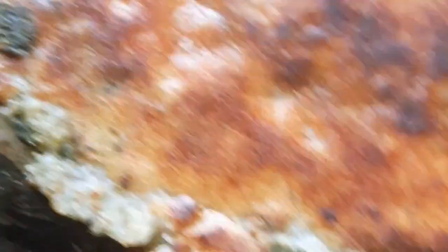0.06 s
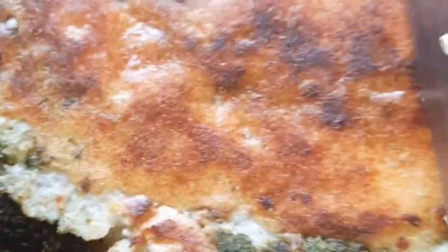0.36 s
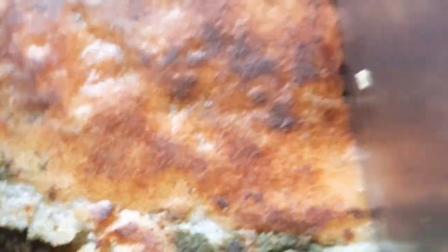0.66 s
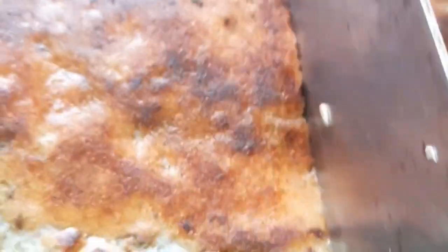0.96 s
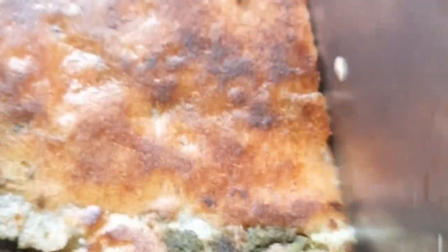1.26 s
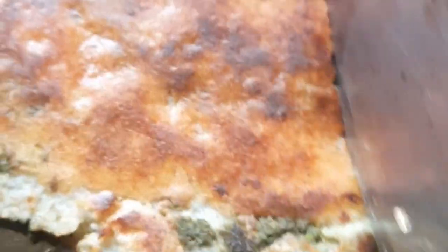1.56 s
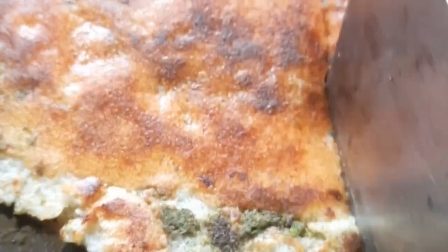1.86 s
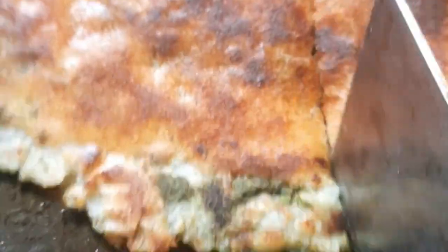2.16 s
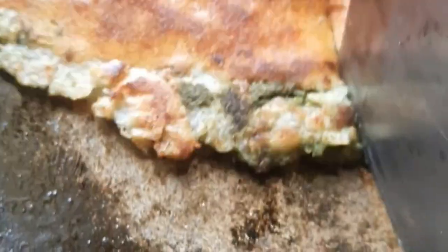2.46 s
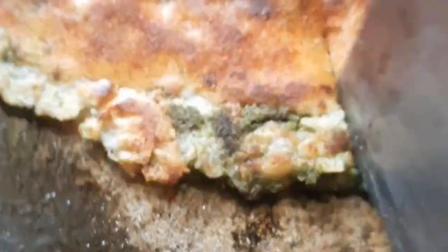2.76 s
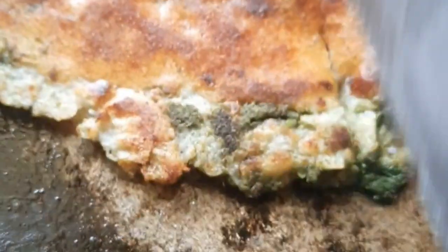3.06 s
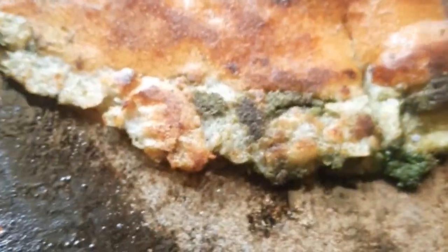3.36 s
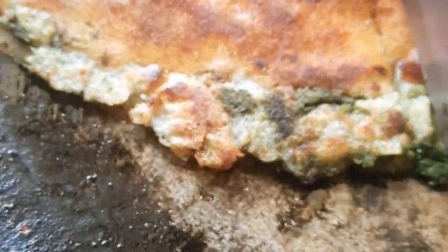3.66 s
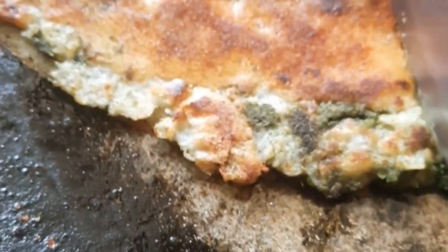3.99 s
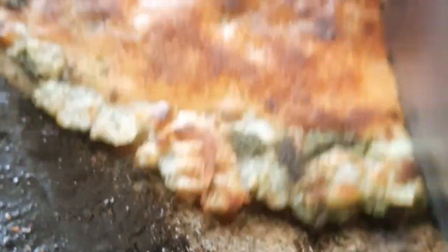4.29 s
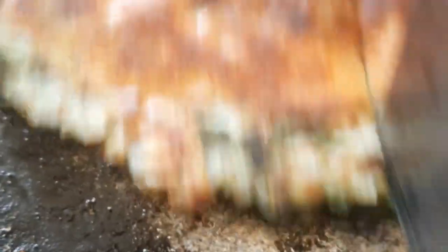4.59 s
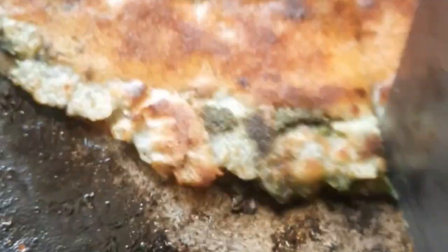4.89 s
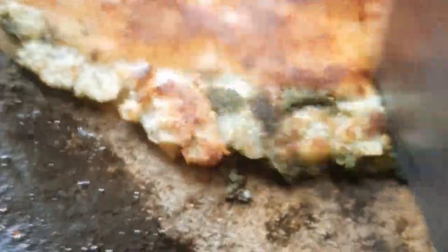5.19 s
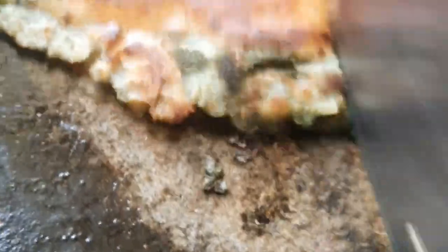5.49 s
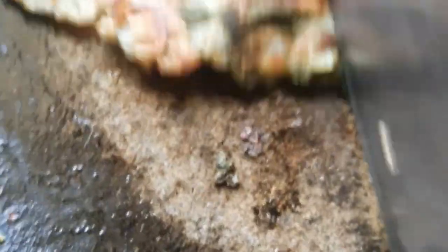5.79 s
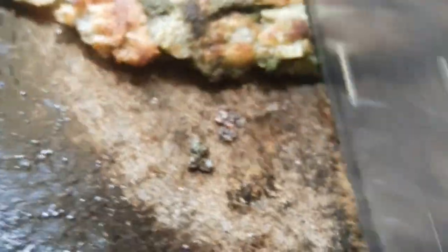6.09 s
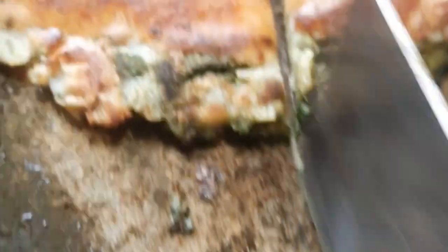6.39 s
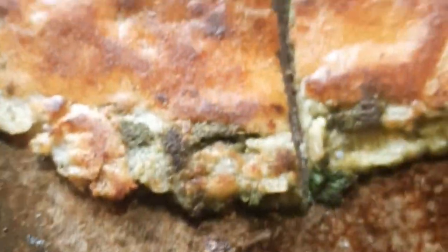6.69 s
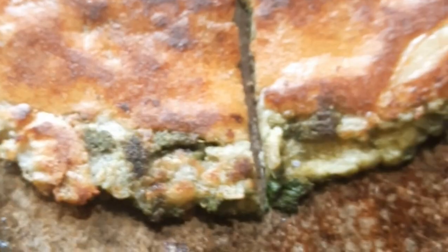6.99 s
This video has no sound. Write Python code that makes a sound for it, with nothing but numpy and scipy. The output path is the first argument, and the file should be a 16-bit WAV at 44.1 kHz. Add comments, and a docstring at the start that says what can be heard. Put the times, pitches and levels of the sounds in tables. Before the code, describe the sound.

A steel spatula works on a hot griddle, heard close in a kitchen with a short reverb and a faint low hum. Oil sizzles quietly throughout, with a few spits, the sharpest at 0.9 seconds. At 0.6 seconds the blade clacks on the plate, and gentle, gritty scrapes follow until about 2.8 seconds. The pancake slides and flops down with a soft, hollow thud around 2.2 seconds, then the blade knocks and rings briefly. From 3 to 4 seconds there is only fizzing and two very faint squeaks. A knock at 4 seconds starts a run of quick, hard scrapes, about seven a second, mixed with crunching crumbs and metallic knocks. The blade rings near 5.9 and 6.4 seconds, with a sharp clack at 6.3. Low puffs of air buffet the microphone's left side between 5.2 and 5.8 seconds, and more softly near 6.8. A thin squeak at 6.5 seconds leaves light sizzling.

```python
"""In a kitchen, a steel spatula works under a pancake on a hot griddle: gently, then in quick hard strokes.
Its edge sticks and slips on the plate, crushes burnt crumbs and knocks; the blade rings as it springs free.
The pancake slides, judders and flops, oil sizzles in tiny bursts of steam, and a few thin squeaks glide by.
Puffs of air buffet the left microphone port. Hard walls add a short reverb over a low room hum."""
import sys
import numpy as np
from scipy import signal
from scipy.fft import rfft, irfft, next_fast_len
from scipy.io import wavfile
from scipy.ndimage import uniform_filter1d

SR = 44100
rng = np.random.default_rng(int(sys.argv[2]) if len(sys.argv) > 2 else 0)


def transcribe(signal):
    """Save signal, clipped to [-1, 1], as a 16-bit WAV file at the path in sys.argv[1]."""
    frames = np.atleast_2d(signal).T
    limited = np.clip(frames, -1, 1)
    pcm = np.round(limited * 32767).astype(np.int16)
    wavfile.write(sys.argv[1], SR, pcm)


N = 310905
TIME = np.arange(N) / SR
SHORT_RING, LONG_RING = SR // 5, SR * 3 // 5   # response lengths in samples


# spatula strokes (time [s], half length [s], level [dB], steepness [dB]); steepness + digs in, - skims
STROKES = [(0.621, 0.018, -48, -20), (0.685, 0.044, -43, -1.5), (0.83, 0.066, -51, -8.5),
           (0.967, .03, -45.5, -1), (1.115, 0.036, -52, 2), (1.27, 0.033, -37.5, 0),
           (1.507, 0.077, -44, 1.5), (1.662, 0.023, -42, 0), (1.85, 0.044, -57, -12),
           (1.978, .025, -39.5, 3), (2.086, 0.037, -49, -4), (2.299, 0.031, -35.5, -10),
           (2.644, 0.04, -49.5, 1), (2.733, 0.03, -37, 2), (3.934, 0.0086, -69, -23.5),
           (4.146, .03, -42.5, 0), (4.271, .032, -29.5, -1), (4.459, 0.029, -29, 1.5),
           (4.569, 0.039, -34.5, 1), (4.66, 0.05, -46.5, 2), (4.767, 0.026, -26.5, 0.5),
           (4.87, 0.074, -41.5, 0), (5.024, 0.022, -33.5, 2), (5.118, 0.035, -37, 7.5),
           (5.262, 0.03, -30, -0.5), (5.405, 0.033, -39.5, -3.5), (5.551, 0.04, -28.5, 1.5),
           (5.68, 0.026, -28.5, -1), (5.824, .027, -26, -0.5), (6.002, 0.036, -26.5, -2.5),
           (6.136, .04, -26.5, -1.5), (6.267, 0.0099, -31, 1.5), (6.364, 0.045, -27.5, -1.5)]

def stroking(middling_db=-34.5, fall_over_rise=0.93):
    """Envelopes of food, plate, blade and grit: a steep blade shakes the plate, a flat one crushes grit."""
    times, half_s, db, steep_db = np.transpose(STROKES)
    effort_db = db - middling_db
    food_db = -40.5 + 0.71 * effort_db
    plate_db = db + 1 + steep_db
    grit_db = -39 + 0.73 * effort_db - 0.75 * steep_db
    grit_half_s = 1.05 * half_s   # grit is crushed even at low speed, so it lingers
    layers = [(half_s, food_db), (half_s, plate_db), (half_s, db), (grit_half_s, grit_db)]
    return [swell(times, rise_s, rise_s * fall_over_rise, layer_db) for rise_s, layer_db in layers]


def friction(slide):
    """Strokes, the brief skid after each knock and the sliding pancake add up in power."""
    food, plate, blade, grit = stroking()
    times, _, clunk_db = np.transpose(KNOCKS)
    skid = swell(times + 0.0021, rise_s=0.007, fall_s=0.016, db=clunk_db)
    food = np.hypot(food, from_db(-1) * slide)
    plate = np.hypot(plate, from_db(-9) * slide)   # the crust scratches the plate
    plate = np.hypot(plate, from_db(-9.5) * skid)
    blade = np.hypot(blade, from_db(-12) * skid)
    grit = np.hypot(grit, from_db(-20.5) * skid)
    return food, plate, blade, grit


# body of the scrape, the blade pressed on the plate (frequency [Hz], width [Hz], level [dB])
PRESSED_MODES = [(544, 33, -1.5), (670, 13.4, 5), (710, 39, -0.5), (808, 44, -5), (929, 12, -2.5),
                 (1740, 79.8, 6), (2060, 44, -7.5), (2576, 36, 0)]
# zing of the blade's highest modes (frequency [Hz], width [Hz], level [dB])
EDGE_MODES = [(4025, 38, 9), (4533, 200, 2), (5124, 36, 6.5), (6010, 29, 6), (7040, 120, -12.5),
              (7550, 36, -6.5)]
# dense metallic wash of the steel (frequency [Hz], level [dB])
STEEL_SPECTRUM = [(250, -10), (500, -14), (750, -5.5), (1080, -6), (1450, -5.5), (1800, 9.5), (2350, -6),
                  (2700, 0.5), (3400, -15), (6000, -13.5), (16000, -53)]
# bright rasp of burnt crumbs (frequency [Hz], level [dB])
GRIT_SPECTRUM = [(2500, -1.5), (3300, -10), (4200, -3.5), (6000, -3.5), (8200, -3), (9000, -20),
                 (10200, -10), (11800, -8), (16000, -10.5)]

def scraping(plate, blade, grit, contacts=3):
    """The edge sticks and slips at a few points; the load wanders between them and shifts the colour."""
    loads = np.array([from_db(10.2 * drift(22)) for _ in range(contacts)])
    loads = loads / np.linalg.norm(loads, axis=0)
    chatter = drift(130)   # bunches the slips into clumps
    out = 0
    for load in loads:
        slips = grains(per_s=750, spread_db=4) * load * from_db(2 * chatter)
        pressed = resonances(PRESSED_MODES, spread=0.39, vary_db=5)
        steel = unit(pressed + from_db(-2.5) * wash(STEEL_SPECTRUM, t60=0.039))
        plate_force = from_db(-2) * drive(slips * plate, steel, low_hz=608, high_hz=1122)
        blade_force = from_db(0.43) * drive(slips * blade, steel, low_hz=1510, high_hz=3044)
        # crumbs are crushed under the same point and stir the blade's highest modes
        rasp = grains(per_s=6000, spread_db=2) * load * from_db(1.5 * chatter)
        crunch = wash(GRIT_SPECTRUM, t60=0.01)
        edge = unit(crunch + from_db(-8.5) * resonances(EDGE_MODES, spread=0.47, vary_db=6))
        out = out + through(plate_force + blade_force, steel) + from_db(0.88) * through(rasp * grit, edge)
    return out


# hits of the edge on the plate (time [s], crack level [dB], clunk level [dB])
KNOCKS = [(0.6259, -2.5, -17), (1.193, -40, -29), (1.451, -43, -37), (1.806, -28, -29.5), (2.263, -43, -31),
          (2.299, -16.5, -21), (3.9909, -7, -25.5), (4.233, -14, -21.5), (4.348, -27, -17.5),
          (4.425, -45, -24), (4.841, -15, -15.5), (4.986, -36, -28.5), (5.112, -21.5, -24),
          (5.348, -22, -17.5), (5.514, -18, -24.5), (5.577, -20.5, -20), (5.776, -27, -25),
          (5.862, -11, -11.5), (6.164, -9.5, -21.5), (6.3008, -1.5, -20)]
# bright crack of the struck blade (frequency [Hz], width [Hz], level [dB])
CRACK_MODES = [(1770, 150, 0), (1990, 240, 0), (2660, 280, -2), (4010, 200, -18), (5230, 200, -19)]
# dull clunk of the struck plate (frequency [Hz], width [Hz], level [dB])
CLUNK_MODES = [(525, 33, -2.5), (778, 52, 11), (943, 25, 7)]

def knocking():
    """The edge hits: the blade cracks, the plate clunks, and a dense steel tail follows."""
    times, crack_db, clunk_db = np.transpose(KNOCKS)
    attack = from_db(-9) * wash(STEEL_SPECTRUM, t60=0.015)
    tail = from_db(-2.5) * wash(STEEL_SPECTRUM, t60=0.13)
    crack = band(resonances(CRACK_MODES, spread=0.7) + attack + tail, 950, 15000, order=1)
    clunk = band(resonances(CLUNK_MODES, spread=0.8), 380, 2500, order=2)
    return sum(through(taps(times, db), body / np.abs(body.mean(0)).max())
               for db, body in [(crack_db, crack), (clunk_db, clunk)])


# the blade springs free (time [s], level [dB])
RELEASES = [(0.627, -42), (2.305, -29.5), (3.991, -44.5), (5.863, -28), (6.021, -29), (6.391, -33)]
# ring of the free blade (frequency [Hz], level [dB], t60 [s])
FREE_MODES = [(658, -11, .6), (921, 2, .66), (1186, -4, .4), (1415, -8, .38), (1610, -8, .62),
              (1750, -6, .52), (2207, -6, .47), (2756, -12, .5), (3016, -11, .4), (3965, -20, .45),
              (5965, -21, .3)]

def ringing():
    """Lifted off the plate, the blade rings out freely."""
    partials = [(hz, from_db(db), np.log(1000) / t60) for hz, db, t60 in FREE_MODES]
    return through(taps(*np.transpose(RELEASES)), modes(partials, spread=1, size=LONG_RING))


# pushes of the pancake (time [s], half length [s], level [dB])
SLIDES = [(0.704, 0.058, -43.5), (1.326, 0.038, -43), (1.695, 0.047, -45.5), (2.035, 0.052, -34),
          (2.363, .08, -38.5), (2.832, 0.21, -51)]

def sliding():
    """Envelope of the pancake sliding over the plate."""
    times, half_s, db = np.transpose(SLIDES)
    return swell(times, half_s, half_s, db)


# a fold of food flops down (time [s], level [dB])
FLOPS = [(0.662, -31.5), (2.147, -27.5), (2.191, -25)]
# muffled drag of soft food (frequency [Hz], level [dB])
FOOD_SPECTRUM = [(130, -11), (230, -14.5), (310, 6), (380, 0), (520, 2.5), (610, -4.5), (800, -33)]

def dragging(food, hollow_hz=307, hollow_t60=0.36):
    """Soft food judders and flops; both, like the knocks, stir the griddle's hollow lowest mode."""
    judder = grains(per_s=1500, spread_db=1.5) * food
    drag = from_db(-1.5) * through(judder, wash(FOOD_SPECTRUM, t60=0.07))
    knock_times, crack_db, _ = np.transpose(KNOCKS)
    flops = taps(*np.transpose(FLOPS))
    hollow = modes([(hollow_hz, 1, np.log(1000) / hollow_t60)], spread=0.79, size=LONG_RING)
    push = from_db(-14) * judder / np.linalg.norm(hollow.mean(0))
    push += from_db(-32.5) * taps(knock_times, crack_db) + from_db(-3.5) * flops
    thud = modes([(284, 0.475, 130)], spread=0.5)
    return drag + through(push, hollow) + through(flops, thud)


# hoarse tone of the sliding crust (frequency [Hz], width [Hz], level [dB])
CRUST_MODES = [(565, 28, 0.5), (700, 120, -9.5)]

def rubbing(slide):
    """The crust grips and lets go in quick small slips."""
    slips = grains(per_s=600, spread_db=2.5) * slide
    return from_db(-3) * through(slips, resonances(CRUST_MODES, spread=0.5))


# vigour of the frying (time [s], level [dB])
SIZZLE_ENVELOPE = [(0, -63), (.25, -60), (.4, -53), (3.0, -57), (3.6, -61.5), (3.8, -53.5), (7, -60)]
# single spits of oil (time [s], level [dB])
SPITS = [(0.2725, -42.5), (0.5087, -42), (0.5721, -36.5), (0.9015, -24), (1.05, -38), (2.9123, -40.5),
         (6.5928, -44.5), (6.763, -45)]
# airy fizz of hot oil (frequency [Hz], level [dB])
SIZZLE_SPECTRUM = [(1500, -10), (3000, -5), (5000, -2), (7800, 1), (9300, -11.5), (12000, -4),
                   (16000, -6.5)]

def sizzling():
    """Tiny bursts of steam all over the oil, with a few louder spits."""
    bursts = np.array([grains(per_s=2300, spread_db=3) for _ in range(2)])
    heat_db = np.interp(TIME, *np.transpose(SIZZLE_ENVELOPE))
    spit = wash(SIZZLE_SPECTRUM, t60=0.026) + from_db(-4.5) * wash(SIZZLE_SPECTRUM, t60=0.067)
    spits = through(taps(*np.transpose(SPITS)), spit / np.abs(spit).max())
    fizz = bursts * from_db(heat_db + 0.9 * drift(10))
    return colour(fizz, SIZZLE_SPECTRUM) + from_db(6) * spits


# faint squeaks (time [s], length [s], start pitch [Hz], middle pitch [Hz], end pitch [Hz], level [dB])
SQUEAKS = [(3.124, .15, 1870, 2236, 2030, -53), (3.746, 0.16, 2015, 2120, 1870, -56.5),
           (6.446, 0.108, 2190, 2140, 2080, -37)]

def squeaking():
    """Thin gliding tones, roughened by a fast waver in pitch."""
    out = np.zeros(N)
    waver = 1 + 0.04 * drift(900)
    for start, length, start_hz, middle_hz, end_hz, db in SQUEAKS:
        along = np.clip((TIME - start) / length, 0, 1)
        hz = np.interp(along, [0, 0.5, 1], [start_hz, middle_hz, end_hz]) * waver
        out += from_db(db) * np.sin(np.pi * along) * np.sin(2 * np.pi * np.cumsum(hz) / SR)
    return out


# rise and fall of the draught (time [s], level [dB])
DRAUGHT_ENVELOPE = [(0.0, -89), (0.61, -86), (0.82, -63), (1.84, -71.5), (2.23, -60.5), (2.43, -69.5),
                    (3.39, -78.5), (3.92, -81), (4.86, -59), (5.16, -53), (5.29, -39), (5.63, -48),
                    (6.12, -61.5), (6.45, -58.5), (6.8, -47.5), (7.04, -49)]
# its hardest puffs (time [s], level [dB])
PUFFS = [(0.872, -35.5), (0.987, -34.5), (5.192, -15), (5.306, -15), (5.445, -21), (5.755, -18.5),
         (5.823, -16), (6.839, -26.5)]
# rumble of air on the port (frequency [Hz], level [dB])
AIR_SPECTRUM = [(20, -44), (45, 0.5), (90, 5.5), (170, -6.5), (300, -26), (600, -47.5)]

def buffeting(turbulence_db=3.5, lumps_per_s=29, puff_half_s=0.0069):
    """A lumpy draught with a few hard puffs: low turbulence, almost all on the left port."""
    draught_db = 10 + np.interp(TIME, *np.transpose(DRAUGHT_ENVELOPE))
    draught = from_db(draught_db + turbulence_db * drift(lumps_per_s))
    times, db = np.transpose(PUFFS)
    envelope = np.hypot(draught, swell(times, puff_half_s, puff_half_s, db))
    air = noise(AIR_SPECTRUM, size=N)
    even_air = air / np.sqrt(uniform_filter1d(air ** 2, size=800, axis=1) + 1e-9)
    return envelope * even_air * from_db([[-0.5], [-27]])


# panning across the spectrum (frequency [Hz], left minus right [dB])
PAN = [(200, 0), (380, 1.5), (700, 8.5), (1300, 2.5), (2400, 0.5), (4400, 0)]

def kitchen(x, wet_db=-11, t60=0.74, build_s=0.0058):
    """Hard walls answer within a few milliseconds; the low steel tones lean to the left."""
    wall_spectrum = [(100, -1), (700, -1), (2200, -4), (5000, -2.5), (15000, -1.5)]
    walls = wash(wall_spectrum, t60, size=LONG_RING) * np.minimum(TIME[:LONG_RING] / build_s, 1)
    wet = x + from_db(wet_db) * through(x, unit(walls))
    pan = from_db(at_hz(PAN, np.fft.rfftfreq(N, 1 / SR)) * [[0.5], [-0.5]])
    return irfft(rfft(wet) * pan / pan.mean(0), N)


# low bed of the kitchen (frequency [Hz], level [dB])
ROOM_SPECTRUM = [(25, -15.5), (65, 2), (140, -10.5), (310, -4.5), (1000, -22.5), (3000, -27), (6000, -52.5)]

def room_tone():
    """A faint, steady hum of low noise."""
    return from_db(-70.5) * noise(ROOM_SPECTRUM, size=N)


# stereo image, mono bass and wide treble (frequency [Hz], left-right likeness [0..1])
LIKENESS = [(100, 1), (600, 0.47), (1500, 0), (2800, 0), (4500, 0), (15000, 0.2)]

def noise(spectrum, size):
    """Coloured stereo noise, wider in the treble; mid rms 1."""
    hz = np.fft.rfftfreq(size, 1 / SR)
    alike = np.clip(at_hz(LIKENESS, hz), -1, 1)
    mid, side = rfft(rng.standard_normal((2, size)))
    both = np.sqrt(1 + alike) * mid + np.sqrt(1 - alike) * side * [[1], [-1]]
    return unit(irfft(both * from_db(at_hz(spectrum, hz)), size)) * np.sqrt(size)


def wash(spectrum, t60, size=SHORT_RING):
    """Countless overlapping modes: noise that dies away."""
    return unit(noise(spectrum, size) * from_db(-60 * TIME[:size] / t60))


def modes(rows, spread, size=SHORT_RING):
    """Damped sines (frequency [Hz], gain, decay [1/s]); spread parts their left and right phases."""
    out, t = 0, TIME[:size]
    for k, (hz, gain, decay) in enumerate(rows):
        phase = 2 * np.pi * hz * t
        side = spread * (1 - at_hz(LIKENESS, hz)) * (-1) ** k * np.cos(phase)
        out = out + gain * np.exp(-decay * t) * (np.sin(phase) + side * [[1], [-1]])
    return out


def resonances(peaks, spread, vary_db=0):
    """Response of a body whose resonances vary in strength with the point of contact."""
    rows = [(hz, width * from_db(db + vary_db * rng.normal()), np.pi * width) for hz, width, db in peaks]
    return unit(modes(rows, spread))


def grains(per_s, spread_db):
    """Random clicks of uneven size and either sign; rms 1."""
    chance, sizes = rng.random(N), rng.standard_exponential(N)
    at = np.flatnonzero(chance < per_s / SR)
    clicks = np.zeros(N)
    clicks[at] = from_db(spread_db * np.minimum(sizes[at], 4)) * np.sign(chance[at] * SR - per_s / 2)
    return clicks / (clicks.std() + 1e-12)


def taps(times, dbs):
    """One click per event."""
    out = np.zeros(N)
    out[np.round(np.asarray(times) * SR).astype(int)] = from_db(dbs)
    return out


def swell(times, rise_s, fall_s, db):
    """Envelope of a set of movements: each speeds up, peaks at its time and slows down."""
    coarse = TIME[::32]
    since = coarse[:, None] - times
    bells = np.exp(-(since / np.where(since < 0, rise_s, fall_s)) ** 2)
    return np.interp(TIME, coarse, np.sqrt(bells @ from_db(db) ** 2))


def drift(per_s):
    """Random modulation; rms about 1."""
    knots = rng.standard_normal(4000)
    return np.interp(TIME * per_s, np.arange(len(knots)), knots) * np.sqrt(3 / 2)


def drive(force, response, low_hz, high_hz):
    """The part of a force that shakes one range of a body, scaled to keep its level."""
    body_gain = np.linalg.norm(band(response.mean(0), low_hz, high_hz, order=2))
    return band(force, low_hz, high_hz, order=2) / body_gain


def colour(x, spectrum):
    """Smooth EQ; white noise keeps its level."""
    size = next_fast_len(N + 2000)
    gain = from_db(at_hz(spectrum, np.fft.rfftfreq(size, 1 / SR)))
    return irfft(rfft(x, size) * gain / np.sqrt(np.mean(gain ** 2)), size)[..., :N]


def band(x, low_hz, high_hz, order):
    """Causal band-pass."""
    return signal.sosfilt(signal.butter(order, [low_hz, high_hz], "band", fs=SR, output="sos"), x)


def through(x, response):
    """Play a signal through a stereo response."""
    return signal.oaconvolve(np.atleast_2d(x), response, axes=1)[:, :N]


def unit(response):
    """Scale a stereo response to unit mid energy."""
    return response / np.sqrt(np.sum(response.mean(0) ** 2))


def at_hz(points, hz):
    """Read a table on a log-frequency axis."""
    table_hz, values = np.transpose(points)
    return np.interp(np.log(np.maximum(hz, 1)), np.log(table_hz), values)


def from_db(db):
    """Decibels to gain."""
    return 10 ** (np.asarray(db) / 20)


def scene():
    """Spatula, food and oil in the kitchen, over its low hum."""
    slide = sliding()
    food, plate, blade, grit = friction(slide)
    griddle = scraping(plate, blade, grit) + dragging(food) + rubbing(slide)
    griddle += knocking() + sizzling() + squeaking()
    # a high-pass keeps low thump out of the scrapes, knocks and sizzle
    griddle = signal.sosfilt(signal.butter(2, 200, "high", fs=SR, output="sos"), griddle)
    # the blade's clear ring is added dry, leaning slightly left
    dry_ring = ringing() * from_db([[1.2], [-1.5]])
    return kitchen(griddle) + dry_ring + buffeting() + room_tone()


def record(dry, ceiling=1.3, cutoff_hz=16000):
    """Soft clipping rounds the tallest peaks and a steep low-pass cuts the top."""
    rounded = ceiling * np.tanh(dry / ceiling)
    return signal.sosfilt(signal.ellip(12, 0.1, 80, cutoff_hz, fs=SR, output="sos"), rounded)


dry = scene()
out = record(dry)
transcribe(out)
```